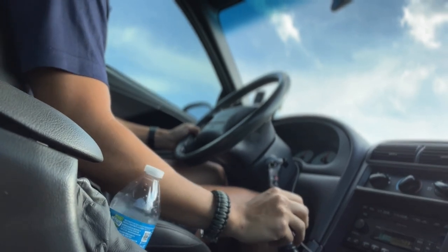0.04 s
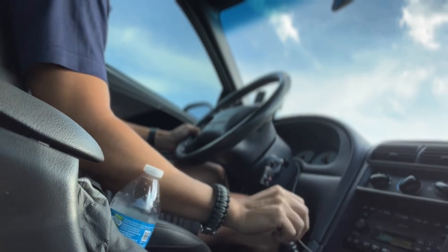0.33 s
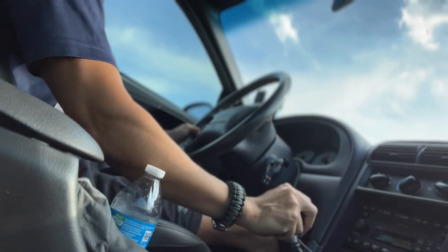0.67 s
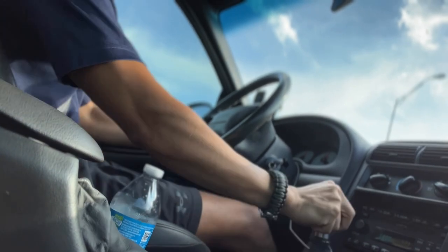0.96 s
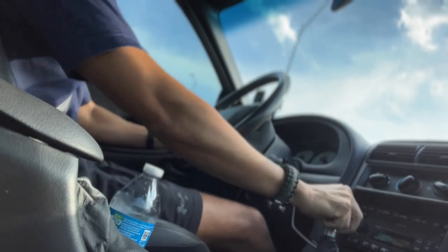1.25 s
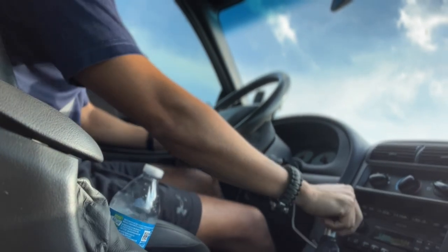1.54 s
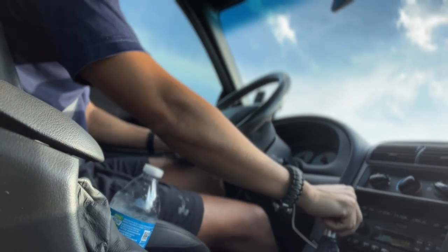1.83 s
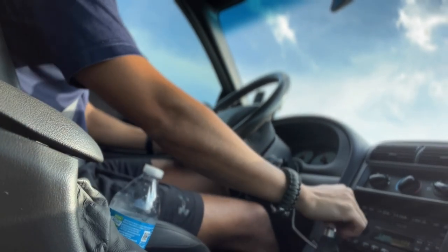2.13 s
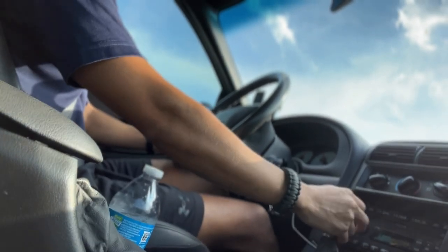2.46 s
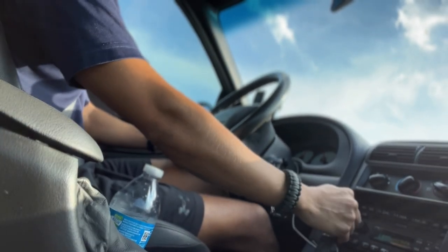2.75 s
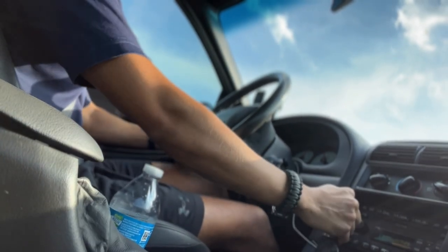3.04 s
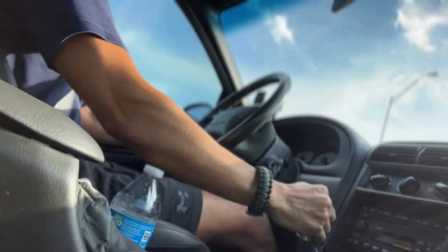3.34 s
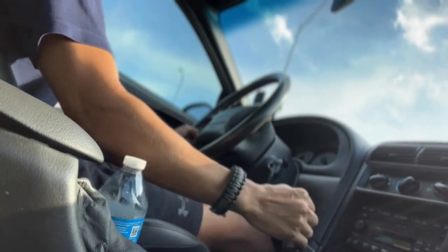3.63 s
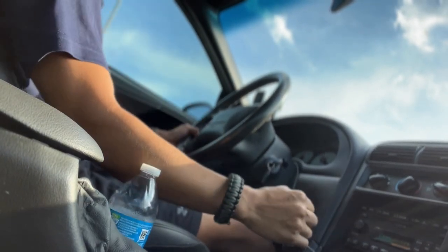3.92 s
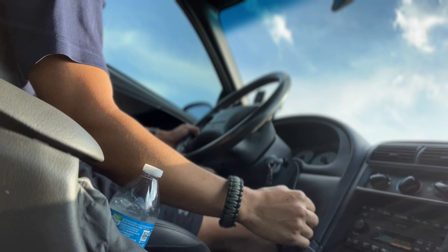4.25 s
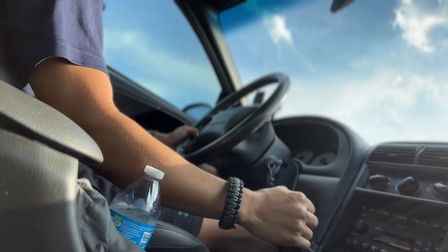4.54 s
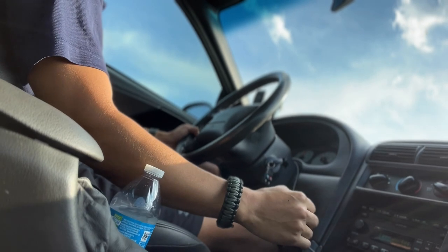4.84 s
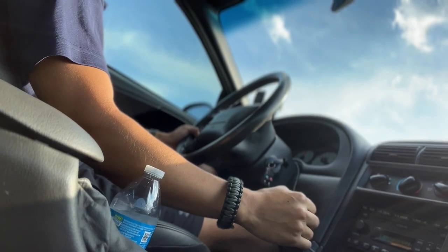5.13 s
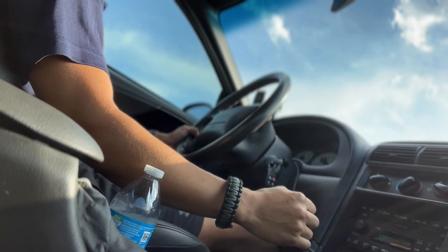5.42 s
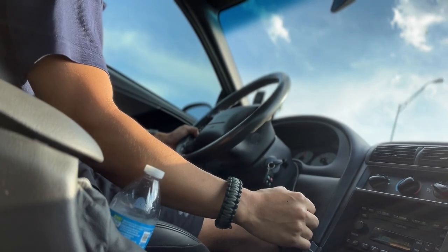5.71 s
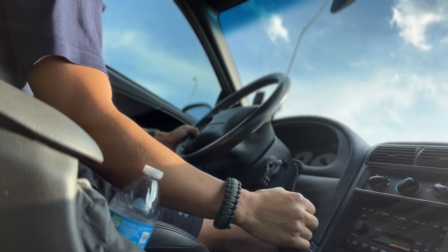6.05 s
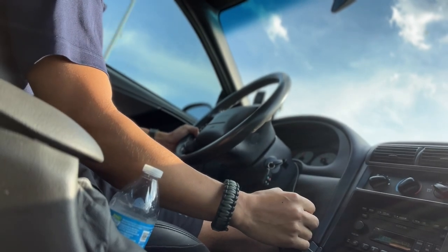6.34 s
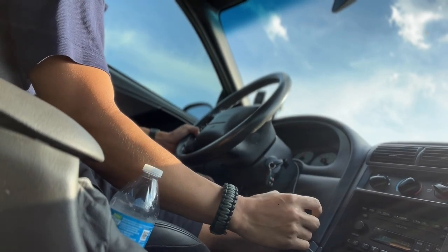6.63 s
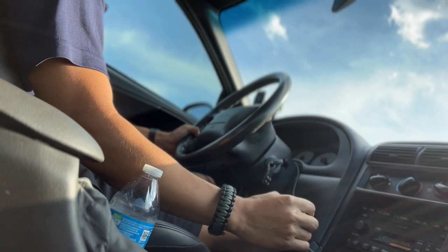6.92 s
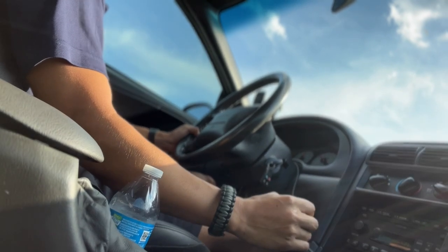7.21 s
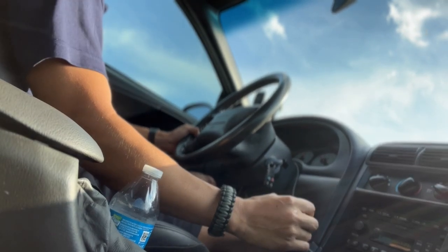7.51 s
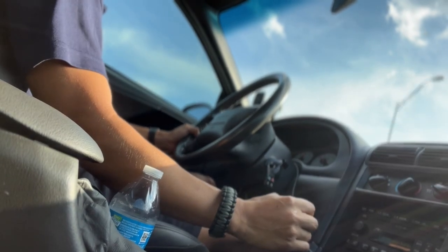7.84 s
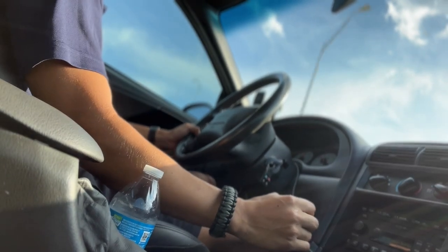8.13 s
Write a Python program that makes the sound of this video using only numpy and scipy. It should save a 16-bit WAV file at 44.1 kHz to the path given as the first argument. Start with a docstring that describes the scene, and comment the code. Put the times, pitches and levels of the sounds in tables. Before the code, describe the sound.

Inside a moving car, the gear lever clicks and clunks, then the V8 engine revs briefly and settles into a booming drone.

```python
"""A supercharged V8, heard from inside the moving car on a stereo pair between the front seats.
It coasts while the gear lever clicks through its gate; the throttle is blipped, the clutch takes up,
and the exhaust pulses settle into a steady drone that booms in the cabin. Tyres rumble through the
body, the gears whine with road speed, the supercharger sings faintly over the rush of its intake,
and the trim squeaks now and then."""
import sys
import numpy as np
from scipy import signal
from scipy.fft import rfft, irfft, next_fast_len
from scipy.io import wavfile

SR = 44100
rng = np.random.default_rng(int(sys.argv[2]) if len(sys.argv) > 2 else 0)


def transcribe(u):
    """Save the signal u as a 16-bit wav file named by the first command-line argument.

    u: samples, shape (n,) or (channels, n), limited to [-1, 1]; the rate is SR.
    q: integer samples, one column per channel.
    """
    v = np.clip(np.atleast_2d(u).T, -1, 1)
    q = np.round(v * 32767).astype(np.int16)
    wavfile.write(sys.argv[1], SR, q)


N = 364707
TIME = np.arange(N) / SR
FREQS = np.fft.rfftfreq(N, 1 / SR)


def gain(db):
    """Decibels to gain."""
    return 10 ** (np.asarray(db) / 20)


def unit_rms(x):
    """Scales to rms 1."""
    return x / np.sqrt(np.mean(x ** 2) + 1e-20)


def at_hz(points, hz):
    """Reads a spectrum on a log-frequency axis."""
    f, value = np.transpose(points)
    return np.interp(np.log(hz + 1), np.log(f + 1), value)


def curves(rows):
    """Each column of a timed table, sample by sample."""
    s, *columns = np.transpose(rows)
    return [np.interp(TIME, s, c) for c in columns]


def swell(s, half_s):
    """A smooth rise to 1 at time s, and the fall after it."""
    return np.exp(-((TIME - s) / half_s) ** 2)


def add(mix, s, sound):
    """Mixes a stereo sound in at time s."""
    part = mix[:, max(round(s * SR), 0):][:, :sound.shape[1]]
    part += sound[:, :part.shape[1]]


def drift(hz, step=32):
    """Slow random motion of rms 1, up to about hz changes a second."""
    count = next_fast_len(N // step + 2)
    rates = np.fft.rfftfreq(count, step / SR)
    slow = irfft(rfft(rng.standard_normal(count)) / (1 + (rates / hz) ** 2), count)
    return unit_rms(np.interp(TIME, np.arange(count) * step / SR, slow))


def phase(hz):
    """Running phase in radians of a steady or moving pitch."""
    return 2 * np.pi * np.cumsum(hz * np.ones(N)) / SR


def throb(rate_hz, depth):
    """A gain of rms 1 that peaks once in every turn."""
    return unit_rms(np.exp(depth * np.cos(phase(rate_hz) + 2 * np.pi * rng.random())))


def fuzzy_tone(hz, width_hz, likeness, pan_db=0):
    """A stereo tone whose strength and phase wander, as a noisily driven resonance does."""
    carrier = np.exp(1j * phase(hz))
    left, other = [unit_rms((carrier * (drift(width_hz) + 1j * drift(width_hz))).real) for _ in range(2)]
    right = likeness * left + np.sqrt(1 - likeness ** 2) * other
    return np.array([left, right]) * gain([[pan_db], [-pan_db]])


def wavering_tone(hz, wobble_hz, left_lag_rad, pan_db):
    """A stereo tone of even strength whose pitch wavers; positive pan is to the left."""
    angle = phase(hz + wobble_hz * drift(20))
    return np.sqrt(2) * np.cos([angle - left_lag_rad, angle]) * gain([[pan_db], [-pan_db]])


# The cabin at the two microphones. Each row: frequency in Hz, correlation of left and right.
MIC_LIKENESS = [(60, 0.96), (180, 0.92), (300, 0.78), (520, 0.38), (890, 0.47), (1400, 0.31), (2600, 0),
                (4500, -.05), (6200, -.2), (8500, 0.84)]
# Each row: frequency in Hz, left minus right in dB.
MIC_BALANCE = [(60, -1), (150, -2.5), (300, -3), (520, 3), (1000, 0.5), (2000, 1.5), (4000, 0),
               (8000, -1.1)]
# Each row: frequency in Hz, lead of the left microphone in radians.
MIC_LEAD = [(60, 0), (300, -.05), (600, -1.4), (1290, -2.8), (1720, -4.5), (2330, -5.6), (3000, -6.28)]


def cabin_noise(spectrum):
    """Diffuse noise of rms 1, shaped by (Hz, dB) points; the microphones agree most in the bass."""
    a, b = rfft(rng.standard_normal((2, N)))
    likeness = at_hz(MIC_LIKENESS, FREQS)
    side = gain(at_hz(MIC_BALANCE, FREQS) / 2) * np.exp(.5j * at_hz(MIC_LEAD, FREQS))
    pair = np.array([a * side, (likeness * a + np.sqrt(1 - likeness ** 2) * b) / side])
    rolloff = 1 / (1 + (FREQS / spectrum[-1][0] / 1.2) ** 8)
    return unit_rms(irfft(pair * rolloff * gain(at_hz(spectrum, FREQS)), N))


# Road speed. Each row: time in seconds, rate at which the gear teeth mesh in Hz.
MESH_RATE = [(0, 1445), (2.5, 1375), (4.1, 1338), (4.9, 1333), (5.35, 1321), (6.7, 1306), (7.6, 1301.5),
             (8.27, 1304.5)]
# Clutch out, the revs sag, then flare with the blip. Each row: time in seconds, firing rate in Hz.
DECLUTCHED_REVS = [(0, 160), (1.6, 150.6), (3.3, 143.7), (3.52, 152.5), (3.8, 188.5), (3.87, 193.5),
                   (3.94, 186), (4.1, 152)]
# The pedal. Each row: time in seconds, throttle opening from 0 to 1.
PEDAL = [(3.5, 0.1), (3.68, 0.74), (3.95, 0.07), (4.15, 0.43), (4.35, 0.24), (4.68, 0.53), (4.98, .88),
         (7.1, 0.81), (8.27, 1)]


def driving(clutch_s=4.06, slip_s=.08, meshes_per_firing=8.9):
    """The clutch ties the revs to the road and turns throttle into load."""
    (mesh_hz,), (free_hz,), (throttle,) = curves(MESH_RATE), curves(DECLUTCHED_REVS), curves(PEDAL)
    clutch = np.clip((TIME - clutch_s) / slip_s, 0, 1)
    firing_hz = (1 - clutch) * free_hz + clutch * mesh_hz / meshes_per_firing
    return firing_hz, mesh_hz, throttle, throttle * clutch


# The exhaust, heard through the floor. Each row: multiple of the engine cycle, relative level in dB.
# Order 8 is the firing rate; the odd ones come from the uneven banks.
ORDERS = [(2, -30), (4, -23), (5, -17.5), (6, -28), (8, 0), (9, -28), (11, -23), (13, -30), (16, -14.5),
          (20, -38), (24, -38)]
# The hum on the overrun. Each row: time in seconds, lift of order 13 in dB.
OVERRUN_HUM = [(0, 23.5), (.55, 25.5), (.85, 1)]
# The exhaust with the throttle shut. Each row: time in seconds, level in dB before the cabin's boom.
SHUT_LEVEL = [(0, -33.5), (.82, -34), (1.0, -48), (1.4, -40), (1.6, -36), (2.05, -38.5), (2.3, -36),
              (2.95, -36), (3.18, -33.5), (3.42, -43.5), (3.62, -34), (4.0, -34), (4.18, -35.5), (4.6, -36)]
# Cabin modes, met by the firing rate. Each row: frequency in Hz, half width in Hz, lift in dB.
BOOM_MODES = [(147.36, 4, 8.1), (175, 7, 5.2), (194, 4.6, 4)]


def exhaust(firing_hz, throttle, load, throttle_db=12, pan_db=-1.23, hiss_db=-58):
    """Orders of the engine cycle boom in the cabin; load brings out the upper ones and a pulsing hiss."""
    (shut_db,), (overrun_db,) = curves(SHUT_LEVEL), curves(OVERRUN_HUM)
    boom_db = sum(db / (1 + ((firing_hz - hz) / width) ** 2) for hz, width, db in BOOM_MODES)
    load_db = -11 + 11.5 * load
    cycle = phase(firing_hz / 8)
    drone = np.zeros(N)
    for order, db in ORDERS:
        spread = .42 if order % 8 else .015 + .3 * (1 - load) ** 3  # load steadies the firing note
        strength = gain(db + overrun_db * (order == 13) + load_db * (order >= 16))
        wander = 1 + spread * (drift(3) + 1j * drift(4.4))  # no two cycles burn alike
        drone += strength * (wander * np.exp(1j * (order * cycle + 2 * np.pi * rng.random()))).real
    drone = np.sqrt(2) * drone * gain([[pan_db], [-pan_db]])
    hiss = cabin_noise([(1200, -6), (1700, 4.5), (2300, 1), (2800, .5), (3700, -5), (4300, -10.5),
                        (4800, -6.5), (6500, -13), (9500, -16), (11000, -25)])
    hiss *= gain(hiss_db + load_db) * throb(firing_hz, .55)
    exhaust_db = shut_db + throttle_db * throttle + boom_db
    return gain(exhaust_db) * (drone + hiss), exhaust_db


# Supercharger and belt, beyond the bulkhead.
# Each row: multiple of the firing rate, width in Hz, relative level in dB.
BLOWER_PARTIALS = [(11.1, 40, 3), (12.0, 30, 2), (13.12, 12, 1), (14.9, 20, -1), (16.5, 6, -2),
                   (17.1, 14, -5), (19.4, 25, -2), (24.2, 18, -6), (25, 20, -1), (27.6, 20, -3),
                   (30.8, 26, -2), (34.1, 18, -10), (35.0, 18, -8), (36.5, 18, -9), (39.9, 18, -10),
                   (42.5, 22, -12), (47.7, 25, -9), (57.1, 30, -12), (63.6, 16, -13)]


def supercharger(firing_hz, exhaust_db):
    """The belt-driven blower whines faintly in step with the revs, swelling with the exhaust."""
    whine = sum(gain(db) * fuzzy_tone(firing_hz * ratio, width, .4)
                for ratio, width, db in BLOWER_PARTIALS)
    return gain(.7 * exhaust_db - 63) * whine


# Road noise all round the microphones: floor, panels, tyres and air.
# Each row: frequency in Hz, relative spectral density in dB.
FLOOR_RUMBLE = [(15, -39.5), (25, -16.5), (33, -11), (41, -15), (52, -1), (60, 2.5), (74, -1), (92, -2),
                (112, -8), (135, -7), (180, -24.5), (400, -79.5)]
PANEL_BOOM = [(70, -39), (115, 5.5), (150, 7), (190, 3), (235, 1.5), (280, -3.5), (340, -10), (600, -55)]
TYRE_ROAR = [(180, -24.5), (290, 1), (360, 0), (450, -2.5), (540, -8.5), (700, -8.5), (830, -10),
             (1020, -10.5), (1130, -14), (1350, -12), (1550, -21), (2600, -56)]
AIR_RUSH = [(900, -20), (1600, -.5), (2200, 0), (2400, -5), (2650, -5), (3100, -9), (3550, -12),
            (4000, -12.5), (4850, -16.5), (5350, -16), (5900, -18.5), (6350, -19), (6500, -22), (6900, -21),
            (7700, -26), (8500, -23.5), (9500, -24), (10400, -29.5), (12000, -32.5), (13000, -37)]
# Uneven patches of road. Each row: time in seconds, lift of the rumble in dB.
ROAD_BUMPS = [(.88, 2), (1.602, 2), (2.28, 5), (3.15, 2), (3.85, 4.5), (4.35, 3.5), (5.049, 4), (5.6, 3.5),
              (6.3, 0), (7.251, -2.5), (7.9, 0.5)]
# Coarseness of the asphalt. Each row: time in seconds, level of the tyre roar in dB.
ROAR_LEVEL = [(0, -37), (2.4, -37), (4.7, -34.5), (6.1, -34.5), (8.27, -37)]


def road(rumble_db=-26.5, boom_db=-30.5, rush_db=-53.5):
    """Tyres shake floor and panels, more so over bumps; the asphalt's grain makes their roar flutter."""
    bump_db = sum(db * swell(s, half_s=.15) for s, db in ROAD_BUMPS)
    roar_db, = curves(ROAR_LEVEL)
    floor = gain(rumble_db + bump_db) * cabin_noise(FLOOR_RUMBLE)
    panels = gain(boom_db + .21 * bump_db + 1.62 * drift(1.8)) * cabin_noise(PANEL_BOOM)
    tyres = gain(roar_db + 1.3 * drift(13)) * cabin_noise(TYRE_ROAR)
    air = gain(rush_db + .48 * (roar_db - roar_db.mean()) + .5 * drift(12)) * cabin_noise(AIR_RUSH)
    return floor + panels + tyres + air


# The gears, under the floor below the microphones. Each row: time in seconds, overall level in dB.
WHINE_LEVEL = [(0, -61), (2.4, -58.5), (3.2, -50.5), (3.7, -46), (4.6, -47.5), (5.3, -44.5), (6.2, -45.5),
               (7.1, -49), (8.27, -48)]
# The driveline's ring builds as the car pulls. Each row: time in seconds, level in dB.
RING_LEVEL = [(0, -57), (.6, -48), (1.1, -59), (1.7, -49.5), (2.7, -50.5), (4.4, -47.5), (4.6, -43.5),
              (4.85, -46.5), (5.8, -44), (6.85, -47.5), (7.05, -40.5), (7.55, -42.5), (7.85, -44),
              (8.27, -48)]
# It grows purer under load. Each row: load from 0 to 1, pitch in Hz, steady share of the power.
RING_BY_LOAD = [(0, 781, .05), (.85, 776, .55)]


def driveline(mesh_hz, load, meshes_per_wheel_turn=117, shuffle_hz=5.3):
    """Gear whine sinks with road speed and the driveline rings along; both flutter as the wheels turn."""
    (whine_db,), (ring_db,) = curves(WHINE_LEVEL), curves(RING_LEVEL)
    wheel_hz = mesh_hz / meshes_per_wheel_turn * (1 + .1 * drift(6))
    mesh = gain(-4.5) * wavering_tone(mesh_hz, 9, 1.65, -1.3)
    mesh += gain(-2) * fuzzy_tone(mesh_hz, 24, -.2, -1.9)
    lower_mesh = gain(-5) * fuzzy_tone(mesh_hz * .945, 28, -.34, -.52)
    loads, *columns = np.transpose(RING_BY_LOAD)
    ring_hz, steady = [np.interp(load, loads, c) for c in columns]
    ring = np.sqrt(steady) * wavering_tone(ring_hz, 9, 0, -2)
    ring += np.sqrt(1 - steady) * fuzzy_tone(ring_hz, 24, .3, -2)
    ring *= throb(wheel_hz, .35)
    ring *= throb(shuffle_hz * (1 + .1 * drift(4)), .22)  # the driveline winds up and lets go
    ring *= gain(ring_db + drift(40))
    return gain(whine_db) * (mesh * throb(wheel_hz, .35) + lower_mesh) + ring


# The hollows of the cabin around the microphones. Each row: frequency in Hz, width in Hz, level in dB.
HOLLOW_MODES = [(196.4, 9.1, -42.5), (229.7, 11, -49), (434.4, 11, -53), (999, 11, -62.5), (1058, 19, -58)]


def cabin_hollows():
    """Stirred by the road, the cabin's hollows hum."""
    return sum(gain(db) * fuzzy_tone(hz, width, at_hz(MIC_LIKENESS, hz), -.6)
               for hz, width, db in HOLLOW_MODES)


# The tread sings up, out at the wheels. Each row: time in seconds, half length in seconds, lift in dB.
TREAD_SWELLS = [(.42, .04, 6), (.6, .1, 7.5), (1.9, .15, 4), (2.21, .04, 7), (2.45, 0.14, 6),
                (2.87, 0.057, 14), (3.0, .055, 10), (4.2, .15, 4)]
# Changes of surface. Each row: time in seconds, half length in seconds, level of the drone in dB.
SURFACE_DRONES = [(1.199, 0.39, -41.5), (2.903, .2, -50)]


def tyre_tread(load, sing_db=-54, drone_hz=455):
    """The tread sings, less when the car pulls, and drones briefly on changes of surface."""
    song = gain(-5) * wavering_tone(935, 9, .5, -1) + gain(-2) * fuzzy_tone(940, 28, .5, -1)
    lift_db = sum(db * swell(s, half_s) for s, half_s, db in TREAD_SWELLS)
    patches = sum(gain(db) * swell(s, half_s) for s, half_s, db in SURFACE_DRONES)
    return gain(sing_db + lift_db - 3 * load) * song + patches * fuzzy_tone(drone_hz, 22, .37, 1)


def intake(firing_hz, throttle, base_db=-60, db_per_hz=.4, gasp_s=4.86):
    """Air rushes through the throttle in gulps, louder the faster the supercharger turns."""
    air = cabin_noise([(1400, -5), (2200, .5), (3700, -2.5), (4400, -7), (5200, -6.5), (8000, -20),
                       (11000, -31)])
    gasp_db = 8 * swell(gasp_s, half_s=.09)  # as the throttle opens wide
    revs_db = db_per_hz * (firing_hz - firing_hz.max())
    gulps = throb(firing_hz, .5 * throttle)
    return gain(base_db + gasp_db + revs_db) * (.82 + throttle) * gulps * air


# An electrical whistle, faint at the seats. Each row: frequency in Hz, level at full load in dB.
WHISTLE_TONES = [(9453, -84), (9749, -87.5)]


def whistle(load, chirp_s=4.8, chirp_hz=4905, rise_hz_per_s=900):
    """Thin high tones grow as the engine pulls, with one short rising chirp as the throttle opens."""
    tones = sum(gain(db) * np.sqrt(2) * np.sin(phase(hz + 2.3 * drift(10))) for hz, db in WHISTLE_TONES)
    lower_tone = gain(-76) * load * fuzzy_tone(4770, 16, .4)
    glide_hz = chirp_hz + rise_hz_per_s * np.clip(TIME - chirp_s, -1, 1)
    chirp = gain(-69) * swell(chirp_s, half_s=.07) * np.sin(phase(glide_hz))
    return tones * (.2 + .8 * load) + lower_tone + chirp


# The trim, near the microphones. Each row: time in seconds, level in dB.
TRIM_SQUEAKS = [(.455, -67), (1.428, -64), (1.99, -67), (7.333, -66)]


def squeaks(pitch_hz=5520):
    """Trim rubs in tiny high squeaks."""
    rubbing = sum(gain(db) * swell(s, half_s=.005) for s, db in TRIM_SQUEAKS)
    return rubbing * fuzzy_tone(pitch_hz, 140, .68)


# Gear lever and trim, within arm's reach.
# Each row: start in seconds, overall level in dB, offset of the clack and its ring in dB.
PLASTIC_CLICKS = [(0.7633, -52.5, -14), (0.8784, -53.5, -3), (.9294, -58, -3), (1.2894, -56, -3),
                  (1.5653, -58, 4), (1.7145, -48, -7), (2.188, -62, 3), (2.2155, -55.5, 2),
                  (2.271, -49, -5), (2.2765, -50.5, -8), (3.243, -50, -11), (3.3994, -55.5, -8),
                  (4.2617, -51, -7), (4.3368, -43.3, -10), (4.3694, -56, -2)]
# The lever's plastic gate. Each row: frequency in Hz, relative level in dB, 60 dB decay in seconds.
GATE_RING = [(2950, -3, .12), (3630, -3, .1), (4080, -2, .08), (6010, -12, .08)]


def clicks(t60=.078):
    """Plastic strikes plastic: a bright tick and a lower clack, which sets the gate ringing."""
    out, t = np.zeros((2, N)), np.arange(SR // 3) / SR
    tick = cabin_noise([(2000, -16.5), (4000, -1.5), (5900, 2.5), (8500, -8.5), (12000, -10.5),
                        (15000, -26.5)])
    clack = cabin_noise([(1000, -5), (2000, 2), (3600, .5), (4600, -3), (6000, -16), (9000, -34)])
    for s, db, clack_db in PLASTIC_CLICKS:
        noise = gain(-9) * tick + gain(clack_db + 1) * clack
        envelope = gain(db - 60 * t / t60) * (1 - np.exp(-t / .00043))
        add(out, s, envelope * noise[:, round(s * SR):][:, :len(t)])
        ring = sum(gain(mode_db - 60 * t / mode_t60) * np.sin(2 * np.pi * (hz * t + rng.random((2, 1))))
                   for hz, mode_db, mode_t60 in GATE_RING)
        add(out, s, gain(db + clack_db - 2) * ring * (1 - np.exp(-t / .0005)))
    return out


# Jolts, coming up through the body. Each row: start in seconds, thud level in dB,
# knock pitch in Hz, knock level in dB.
BODY_JOLTS = [(.876, -27, 60, -17), (2.18, -21, 145, -13), (2.246, -25, 90, -15), (3.832, -25, 100, -15),
              (4.107, -23, 440, -17), (4.334, -30, 62, -12)]


def jolts(t60=.18, ring_cycles=1.9):
    """The body thuds dully and a knocked panel rings for a few cycles."""
    out, t = np.zeros((2, N)), np.arange(SR // 3) / SR
    thud = cabin_noise([(40, -15), (90, -2), (190, 0), (300, -9), (480, -13), (800, -28), (2000, -46),
                        (6000, -62)])
    for s, thud_db, hz, knock_db in BODY_JOLTS:
        envelope = gain(thud_db - 60 * t / t60) * (1 - np.exp(-t / .0031))
        cycles = hz * t
        knock = np.sin(2 * np.pi * cycles) * np.exp(-cycles / ring_cycles) * (1 - np.exp(-2 * cycles))
        add(out, s, envelope * thud[:, round(s * SR):][:, :len(t)] + gain(knock_db) * knock)
    return out


# The tunnel, midway between the microphones.
# Each row: frequency in Hz, level in dB, 60 dB decay in seconds.
TUNNEL_MODES = [(205, -19, .2), (285, -28, .12), (370, -28, .08), (598, -35, .07), (880, -36, .04),
                (1066, -38, .04)]


def lever_clunk(start_s=2.18):
    """The lever drops into gear, hits its stop and rings the tunnel with a hollow clunk."""
    out, t = np.zeros((2, N)), np.arange(SR // 3) / SR
    clunk = sum(gain(db - 60 * t / t60) * np.sin(2 * np.pi * (hz * t + rng.random()))
                for hz, db, t60 in TUNNEL_MODES)
    add(out, start_s, np.array([clunk, clunk]) * (1 - np.exp(-t / .0013)))
    return out


def casing_buzz(firing_hz, load, full_load_db=-63, jitter_hz=.25, t60=.018):
    """Under load each firing taps the engine's casing, adding a fine buzz of upper harmonics."""
    firings = np.cumsum(firing_hz + jitter_hz * drift(12)) / SR
    taps = np.diff(np.floor(firings), prepend=0) * (1 + .25 * rng.standard_normal(N))
    t = np.arange(SR // 40) / SR
    casing = cabin_noise([(1100, -11.5), (1700, 2.5), (2400, -4), (3200, -8), (4000, -6.5),
                          (5500, -20.5)])
    ring = casing[:, :len(t)] * gain(-60 * t / t60)
    return gain(full_load_db) * load * unit_rms(signal.oaconvolve(taps[None], ring)[:, :N])


def scene():
    """Everything that reaches the pair between the seats."""
    firing_hz, mesh_hz, throttle, load = driving()
    drone, exhaust_db = exhaust(firing_hz, throttle, load)
    engine = drone + supercharger(firing_hz, exhaust_db) + casing_buzz(firing_hz, load) + whistle(load)
    rolling = road() + driveline(mesh_hz, load) + cabin_hollows() + tyre_tread(load)
    knocks = clicks() + jolts() + lever_clunk()
    return engine + rolling + knocks + squeaks() + intake(firing_hz, throttle)


def record(dry, cutoff_hz=13000):
    """The recorder's band limit."""
    lowpass = signal.firwin(511, cutoff_hz, window=("kaiser", 9), fs=SR)
    return signal.oaconvolve(dry, lowpass[None], "same")


dry = scene()
out = record(dry)
transcribe(out)
```